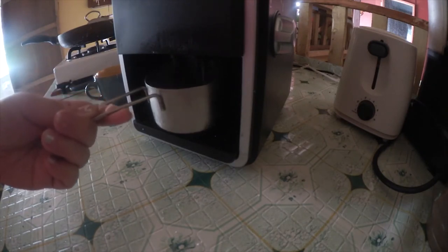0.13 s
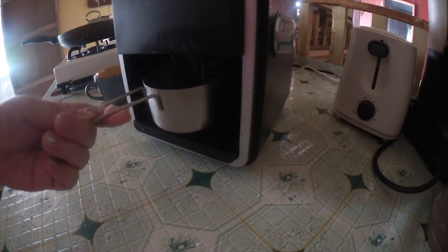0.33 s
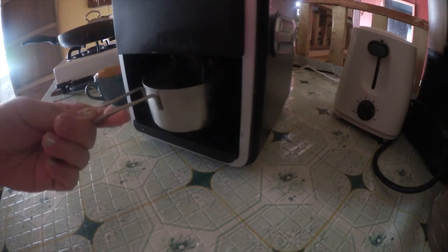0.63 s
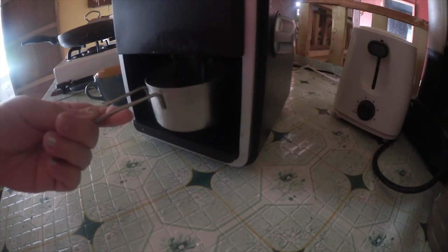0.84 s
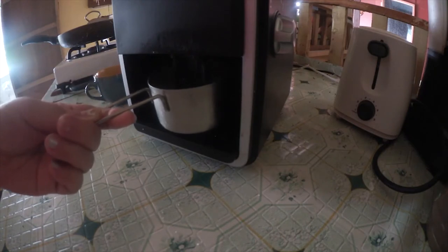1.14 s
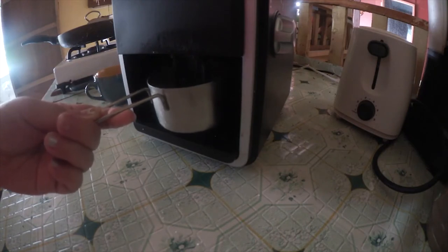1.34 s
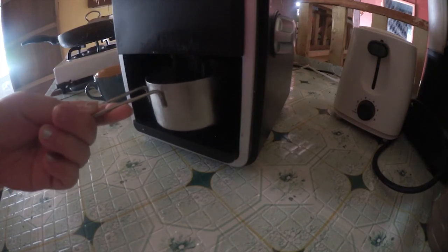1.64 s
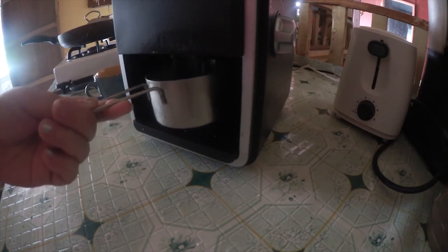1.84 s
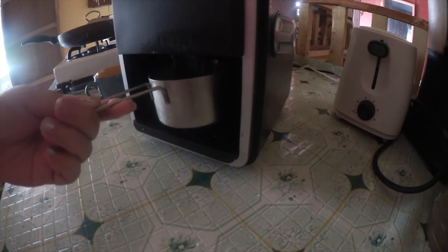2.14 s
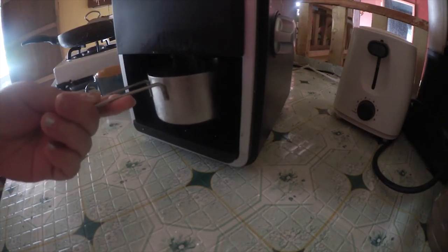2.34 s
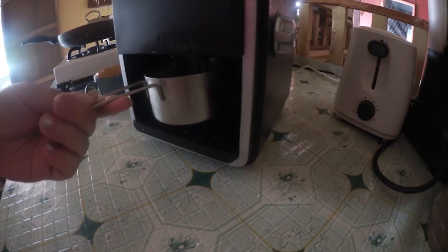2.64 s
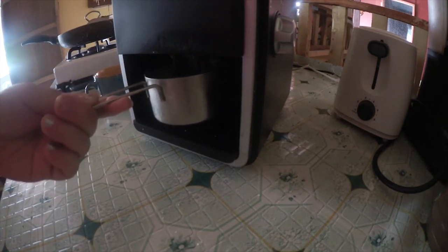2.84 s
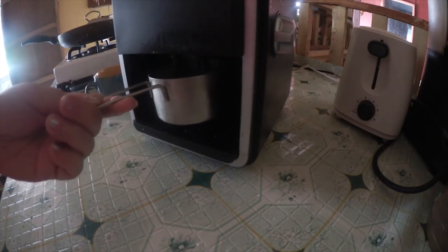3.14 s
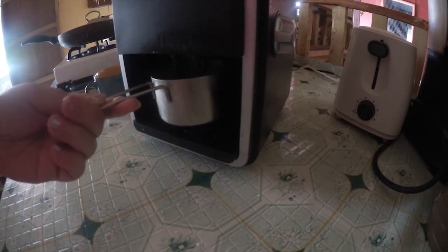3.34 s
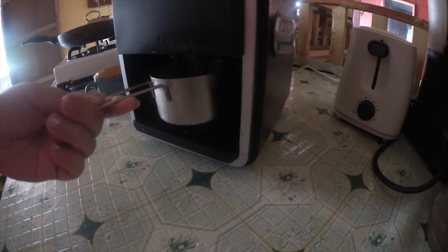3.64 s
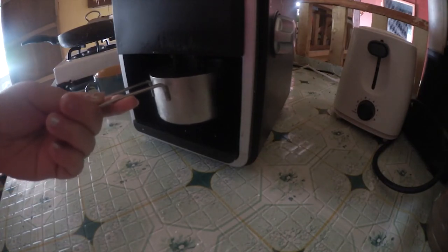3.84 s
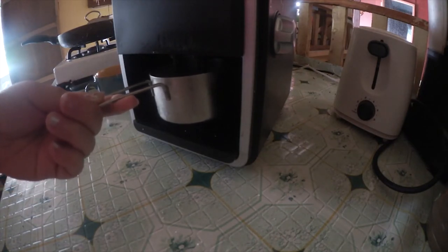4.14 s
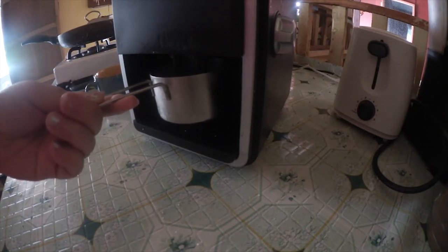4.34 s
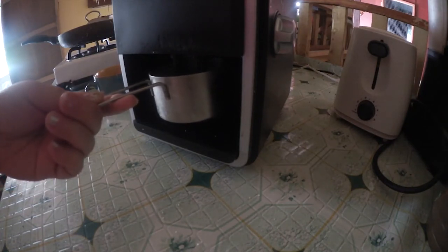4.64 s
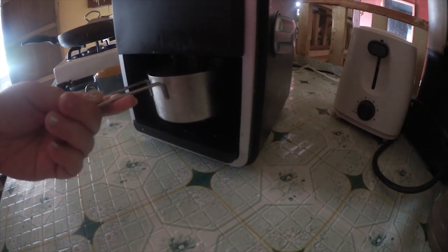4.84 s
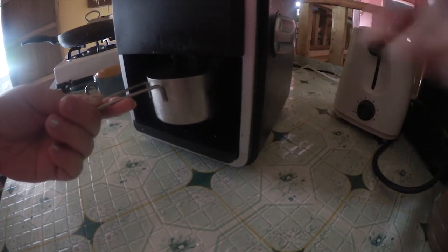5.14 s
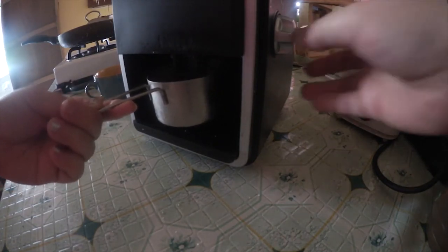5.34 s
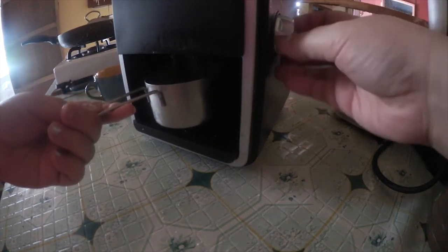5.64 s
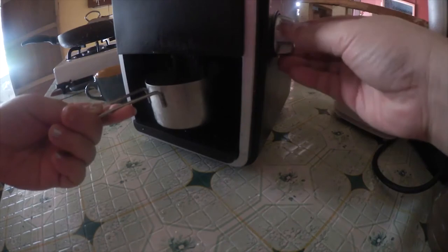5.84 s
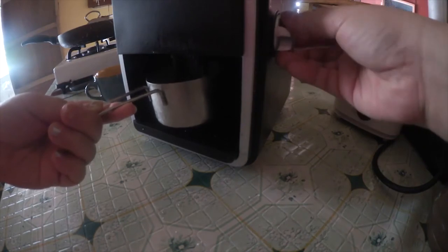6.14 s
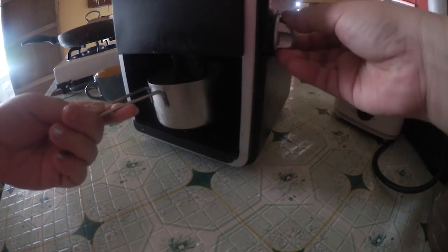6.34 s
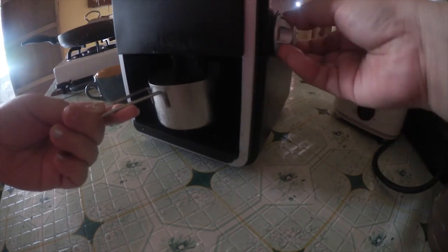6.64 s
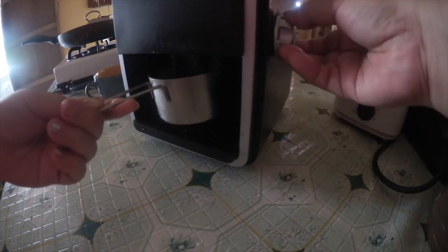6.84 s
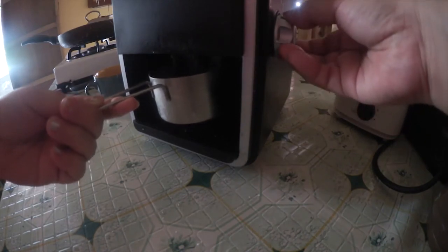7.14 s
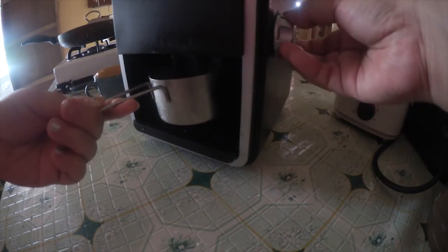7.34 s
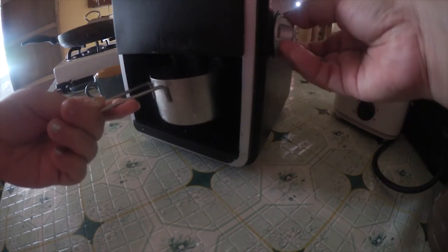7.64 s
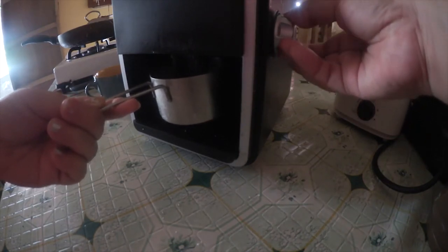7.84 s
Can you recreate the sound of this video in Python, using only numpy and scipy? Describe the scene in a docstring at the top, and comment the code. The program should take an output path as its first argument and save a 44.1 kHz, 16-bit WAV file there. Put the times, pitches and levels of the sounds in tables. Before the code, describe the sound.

From the very start, steam is already blasting into milk in a small steel cup, close and dry, with no silence. For the first 2 s a ragged screech near 1.15 kHz and its rough octave sit under bright, spitting hiss, with a thin whistle near 3 kHz; gulps and a metallic ring grow from about 1.1 s. From 2.2 to 3.5 s it is steadier, a clearer screech with strong upper tone. At 3.55 s it stumbles, dips briefly, then continues lower, near 1 kHz, fluttering and gulping until 5.4 s. Around 5.5-5.8 s the valve is eased: the hiss falls away and the tone leaps to about 1.3 kHz, then wavers downward. From 6 to 8 s a hollow, unsteady whistle dominates, with short hiss spits and breaks near 6.6-6.9 s, low milk thumps at 6.0, 6.2, 6.9 and 7.8 s, and swelling gurgles. A faint hum and low noise lie underneath; it ends still running.

```python
"""Steam frothing milk

A steam nozzle froths milk in a small steel cup, close to a small microphone.
Steam bubble: swells and collapses about a thousand times a second, two rough tones made of sine and noise.
Milk and cup: noise through resonances gurgles, rings and roars; gulps and low thumps come and go.
Jet: coloured noise hisses above, breaking for instants; the valve is later eased shut.
A high whistle of narrow noise sits over the tones; faint low noise and a hum of sines lie below."""
import sys
import numpy as np
from scipy import signal
from scipy.fft import rfft, irfft, next_fast_len
from scipy.io import wavfile
from scipy.ndimage import uniform_filter1d, minimum_filter1d

SR = 44100
rng = np.random.default_rng(int(sys.argv[2]) if len(sys.argv) > 2 else 0)


def persist_wave(psi):
    """Save psi, clipped to +-1, as 16-bit WAV."""
    counts = np.round(np.clip(psi, -1, 1) * 32767).astype(np.int16)
    wavfile.write(sys.argv[1], SR, np.atleast_2d(counts).T)


N = 353152


def gain_of(db):
    """Turns decibels into a plain multiplier."""
    return 10 ** (np.asarray(db) / 20)


def evened(x):
    """Scales a signal to an average strength (rms) of 1."""
    return x / np.sqrt(np.mean(x ** 2) + 1e-20)


def columns(rows, t):
    """Joins the rows of a table with straight lines over time, one curve per column."""
    s, *values = np.transpose(rows)
    return [np.interp(t, s, v) for v in values]


def wander(span_s):
    """Smooth chance of rms 1 that changes within span_s."""
    size = max(int(span_s * SR), 1)
    smooth = uniform_filter1d(rng.standard_normal(N), size)
    return evened(uniform_filter1d(smooth, size))


def resonate(x, hz, width):
    """A moving resonance: shifts the curve hz down to zero, smooths twice, and shifts back."""
    turn = np.exp(2j * np.pi * np.cumsum(hz * np.ones(N)) / SR)
    r = np.exp(-np.pi * width / SR)
    smoothed = signal.lfilter([1], np.convolve([1, -r], [1, -r]), x / turn)
    return (turn * smoothed).real


def sustained(hz, width, hold):
    """Narrow noise on the curve hz; a self-driven bubble holds its strength: hold (0-1) flattens swells."""
    noise = evened(resonate(rng.standard_normal(N), hz, width))
    z = signal.hilbert(noise, next_fast_len(N))[:N]
    flattened = (z / (abs(z) + 0.084) ** np.clip(hold, 0, 1)).real
    return evened(resonate(flattened, hz, 6.5 * width))


# How far the work has come: tip shallow until the 1st time, deep from the 2nd to the 3rd,
# valve closing from the 4th; columns: (time [s])
STAGE_TIMES = [2.2, 2.7, 5.4, 5.7]


def staged(t, values):
    """Glides between one value for each stage: tip shallow, deep, valve closing."""
    return np.interp(t, STAGE_TIMES, np.array(values)[[0, 1, 1, 2]])


# Bands of noise that stand out or fall back for a while; each fades in just before its first time:
# (time fully in [s], time from there until gone [s], centre [Hz], width [Hz], change [dB])
PASSING_BANDS = [(0.061, .59, 2100, 72, 7.5), (1.951, 0.35, 1910, 200, 10), (0.25, 0.5, 2900, 170, 9),
                 (0.94, 0.63, 1710, 120, 7.5), (0.792, 0.71, 6570, 1560, 4), (0.25, 0.32, 7700, 600, 8),
                 (1.301, 0.97, 9400, 640, 3.5), (1.791, 0.12, 2420, 120, 9), (1.71, 0.29, 2770, 300, 4.5),
                 (1.7, 0.45, 3370, 360, -4), (2.901, 0.68, 1300, 300, -13), (2.4, 0.66, 7000, 1300, 5.5),
                 (3.051, 0.27, 8500, 750, 4.5), (2.551, 0.5, 5500, 330, 1.5),
                 (3.101, 0.435, 2370, 220, 5.5), (4.201, 0.58, 1560, 300, -6),
                 (6.281, 0.23, 1620, 280, -11), (5.3, 0.22, 5730, 590, 1.5), (6.011, 0.18, 3700, 430, 3),
                 (6.061, 0.25, 5400, 1300, 5.5), (5.331, 0.17, 5900, 3000, 3),
                 (6.051, 0.73, 2830, 360, 2.5), (6.551, 0.68, 450, 140, 14), (6.961, 0.16, 2450, 120, 11),
                 (7.331, 0.26, 6000, 1000, 6), (7.3, .12, 4300, 1100, 5), (1.821, .06, 5500, 2200, 7)]
BAND_FADE_S = 0.034


def rush(spectrum, modes, patchy_db, tilt_db=0, tilt_hz=8000):
    """Noise of a given colour with modes and drifting patches; tilt_db lifts what lies above tilt_hz."""
    frames, hz = N // 256 + 5, np.fft.rfftfreq(1024, 1 / SR)[:, None]
    a, b, patches = rng.standard_normal((frames, 513, 3)).T
    patches = uniform_filter1d(patches, 8, 0)
    patches = evened(uniform_filter1d(patches, 14, 1))
    f, db = np.transpose(spectrum)
    colour = np.interp(np.log(hz + 1), np.log(f), db, -90, -90)
    t = np.arange(frames) * 256 / SR
    for mode, width, *lifts in modes:
        lift = staged(t, np.resize(lifts, 3))
        colour = colour + lift / (1 + (2 * (hz - mode) / width) ** 2)
    for s, length, mode, width, lift_db in PASSING_BANDS:
        fade = np.clip(np.minimum(t - s + BAND_FADE_S, s + length - t) / BAND_FADE_S, 0, 1)
        colour = colour + fade * lift_db / (1 + (2 * (hz - mode) / width) ** 2)
    tilt = np.interp(t, np.arange(np.size(tilt_db)) / SR, np.atleast_1d(tilt_db))
    tilt = tilt / (1 + (tilt_hz / (hz + 1)) ** 6)
    z = (a + 1j * b) * gain_of(colour + patchy_db * patches + tilt)
    return evened(signal.istft(z, nperseg=1024, noverlap=768)[1][:N])


# Steam bubble, before wobble and surges:
# (time [s], collapse rate [Hz], first tone level [dB], second tone level [dB])
STEAM_BUBBLE = [(0, 1161, -39.5, -34.5), (.55, 1157, -42, -33), (.77, 1186, -39, -29.5),
                (.93, 1195, -35.5, -31), (1.05, 1124, -33, -40.5), (1.4, 1106, -33.5, -37),
                (1.62, 1094, -29, -28), (1.7, 1031, -44, -63), (1.96, 1086, -30.5, -29.5),
                (2.3, 1090, -34.5, -38.5), (2.58, 1104, -36.5, -29), (3.16, 1078, -35.5, -25),
                (3.49, 1107, -31.5, -43), (3.53, 1090, -53, -50), (3.56, 790, -44, -50),
                (3.597, 990, -28.5, -39), (3.8, 1043, -32, -27), (3.88, 1010, -34.5, -38),
                (3.93, 1031, -25, -33), (4.03, 1034, -32, -27), (4.34, 1016, -33.5, -33.5),
                (4.39, 1093, -33, -33), (4.52, 1037, -35, -32.5), (4.6, 1073, -34, -38),
                (4.67, 1003, -31.5, -28), (4.77, 1061, -36, -27.5), (4.82, 1012, -30, -26),
                (4.97, 991.4, -34.5, -30.5), (5.15, 1024, -34, -25.5), (5.25, 1048, -37.5, -31),
                (5.3, 994, -32.5, -39), (5.375, 994, -32, -43), (5.4, 985, -46, -55),
                (5.5, 1070, -41.5, -46), (5.62, 1305, -46, -45), (5.75, 1307, -28.5, -35),
                (5.8, 1242, -29, -33.5), (5.97, 1175, -29, -42), (6.03, 1178, -26.5, -35.5),
                (6.16, 1306, -23, -43), (6.25, 1234, -24.5, -46), (6.4, 1220, -22.5, -36.5),
                (6.51, 1189, -19.5, -28.5), (6.6, 1149, -32.5, -34.5), (6.7, 1093, -24.5, -38),
                (6.85, 1160, -22.5, -37.5), (6.92, 1077, -24.5, -54), (6.97, 1111, -21.5, -45),
                (7.1, 1182, -21.5, -54), (7.21, 1030, -23.5, -46), (7.3, 1203, -26.5, -53),
                (7.6, 1062, -28, -43), (8, 1151, -25.5, -49)]
# Quick wobble of the collapse rate, scaled down where the bubble is less ragged:
# (tip shallow [share], deep [share], valve closing [share])
RATE_WOBBLE = (.022, .018, .045)
# Raggedness 0-1 (more means more noise in the tones) in the three stages, and in a clear whistle.
RAGGED, RAGGED_CLEAR = (.78, .85, .92), .42
# A mode of the cup draws the smeared second tone toward it, by this share, in the three stages.
PULL_HZ, PULL = (2290, 2133, 2470), (0.23, 0.51, 0.46)
# The smeared second tone also strays by this share, this quickly.
SHIFT, SHIFT_S = .017, .04


def screech(t):
    """Two tones locked to the collapse rate smear into noise when ragged; a high whistle sits above them."""
    hz, first_db, second_db = columns(STEAM_BUBBLE, t)
    clear = clearness(t)
    ragged = (1 - clear) * staged(t, RAGGED) + clear * RAGGED_CLEAR
    wobble = staged(t, RATE_WOBBLE) * wander(0.003894) + .015 * wander(0.02991)
    hz = hz * (1 + ragged * wobble)
    phase = 2 * np.pi * np.cumsum(hz) / SR
    pulled_hz = 2 * hz + staged(t, PULL) * (staged(t, PULL_HZ) - 2 * hz)
    smear_hz = {1: hz, 2: pulled_hz * (1 + SHIFT * wander(SHIFT_S))}
    tones = []
    for k, width, hold in [(1, 120.0, 1.0), (2, 215.0, 0.41)]:
        noise_share = ragged ** (1 / k ** 2)  # the higher tone smears sooner
        pure = np.sqrt(2 * (1 - noise_share ** 2)) * np.sin(k * phase)
        tones.append(pure + noise_share * sustained(smear_hz[k], width, hold))
    surge = gain_of(1.94 * ragged * wander(0.051))  # a ragged bubble comes in surges
    first = gain_of(first_db + 1.6 * ragged * wander(0.041))
    second = gain_of(second_db + 3.4 * ragged * wander(0.014))
    return surge * (first * tones[0] + second * tones[1] + high_whistle(t))


# High whistle near 3 kHz, later at 3600 Hz as the bubble's third tone, before its drift:
# (time [s], pitch [Hz], level [dB])
HIGH_WHISTLE = [(0, 3030, -46), (.3, 2970, -37), (.6, 3040, -41.5), (.8, 2990, -48), (1.5, 3040, -42.5),
                (2.0, 3030, -67), (2.95, 3045, -41.5), (3.45, 3060, -41), (3.55, 3026, -49),
                (3.7, 3050, -39.5), (4.0, 3060, -49.5), (4.3, 3051, -38), (4.4, 3077, -49),
                (4.52, 3031, -42), (4.65, 3049, -50), (5.0, 3055, -41), (5.2, 3078, -36), (5.3, 3080, -51),
                (5.53, 3050, -49), (5.7, 2985, -51), (6.4, 3600, -62), (6.47, 3600, -52), (6.66, 3600, -45),
                (6.7, 3570, -54), (6.9, 3570, -61), (8, 3615, -67)]
# Drift of its pitch: (tip shallow [share], deep [share], valve closing [share])
HIGH_WHISTLE_DRIFT = (.013, .013, .003)


def high_whistle(t):
    """High whistle near 3 kHz, later at 3600 Hz (the bubble's third tone): narrow noise, drifting pitch."""
    hz, level_db = columns(HIGH_WHISTLE, t)
    hz = hz * (1 + staged(t, HIGH_WHISTLE_DRIFT) * wander(0.025))
    return gain_of(level_db + 2.7 * wander(0.039)) * sustained(hz, 160.0, hold=.3)


# Steam jet and the roar it makes in the cup, before flutter and hush; the treble tilt counts against
# its own average over the first 5 s: (time [s], hiss level [dB], treble tilt [dB], cup roar level [dB])
STEAM_JET = [(0, -34, -10.5, -32.5), (.6, -34.5, -13, -32.5), (1.3, -34.5, -12.5, -36.5),
             (1.8, -36, -12, -31), (2.4, -34, -13, -31), (3.4, -35, -9.5, -33.5), (3.65, -32.5, -14.5, -32),
             (4.3, -33.5, -14, -34.5), (4.8, -34.5, -15, -34), (5.2, -32, -16.5, -36.5),
             (5.53, -34.5, -18.5, -37.5), (5.66, -38.5, -24, -42), (5.69, -41.5, -26, -41),
             (5.8, -46.5, -24, -37.5), (5.97, -47, -22, -41), (6.06, -41, -17, -36),
             (6.3, -39.5, -20.5, -37), (6.46, -37, -24.5, -34), (6.55, -48.5, -19.5, -34.5),
             (6.74, -43.5, -22, -34), (6.9, -45.5, -21, -37.5), (7.3, -47.5, -16.5, -36),
             (8, -41, -18.5, -39)]
# Colour of the hiss before modes and tilt: (frequency [Hz], level per Hz [dB])
HISS_COLOUR = [(1940, 8.5), (3300, 1), (3640, -6), (4590, 2), (6150, -1), (7330, -1.5), (8350, -7.5),
               (9320, -8), (10400, -12.5), (13600, -16), (15600, -27.5)]
# Modes in the hiss:
# (frequency [Hz], width [Hz], lift with tip shallow [dB], lift deep [dB], lift with valve closing [dB])
HISS_MODES = [(3510, 145, 14.5, 2, 3.5), (3550, 120, -7, -10, 9.5), (3940, 130, -3.5, -1.5, 8),
              (3870, 200, 0.5, 8.5, 6.5), (4450, 550, 5.5, 1, 4.5), (4605, 190, -9.5, -3.5, 11),
              (4676, 240, -5, 5.5, -15), (5510, 290, -1.5, 5, 5.5), (5605, 250, 6.5, 1.5, -7),
              (6053, 120, 11, 3, 1.5), (9200, 630, 3, 0.5, 2.5)]
TOP_FOLLOWS = 1.8  # the treble tilt changes by this many dB for each dB of break or spit


def jet(t):
    """Hiss that flutters and spits as the tip dips in and out of the foam."""
    hiss_db, top_db, _ = columns(STEAM_JET, t)
    drop_db, spit_db = breaks(t)
    burst_db = 1.9 * wander(0.016)  # bursts in the middle of the hiss; the top octave stays steadier
    quick_db = (1.4 + 0.33 * np.maximum(spit_db, 0)) * wander(0.0015)
    flutter_db = burst_db + 0.67 * wander(0.0049) + quick_db
    tilt_db = top_db - top_db[:SR * 5].mean()
    tilt_db = tilt_db + TOP_FOLLOWS * (spit_db + drop_db) - 1.07 * burst_db
    hiss = rush(HISS_COLOUR, HISS_MODES, patchy_db=2.5, tilt_db=tilt_db)
    return gain_of(hiss_db + spit_db + flutter_db) * hiss


# Churned milk between gulps, before wander and sputter:
# (time [s], gurgle centre [Hz], gurgle level [dB], ring level [dB])
MILK_CHURN = [(0, 900, -48, -49), (.55, 928, -45, -42), (1.2, 933, -37.5, -34), (2.0, 940, -34, -32),
              (2.8, 917.5, -41, -35), (2.9, 910, -38.5, -42.5), (3.3, 890, -45.5, -48.5),
              (3.6, 930, -34, -35), (4.3, 932, -37.5, -39), (5.2, 930.3, -42.5, -40),
              (5.5, 887, -38, -34.5), (5.68, 767, -36, -31.5), (5.9, 718.6, -33.5, -36),
              (6.1, 797, -32.5, -36), (6.45, 860.7, -31.5, -31.5), (6.55, 885.4, -35, -38),
              (6.92, 931, -31.5, -31.5), (7.0, 730, -29.5, -31.5), (7.3, 826, -27, -28.5),
              (7.65, 863.5, -29.5, -30), (8, 770, -23, -34.5)]
RING_HZ, RING_DRIFT = 1390, (0.007, 0.01, 0.03)  # the drift is a share, for the three stages


def churn(t):
    """Large air pockets gurgle low and the air over the milk rings, both sputtering; the cup roars."""
    hz, gurgle_db, ring_db = columns(MILK_CHURN, t)
    hz, clear = hz * (1 + 0.033 * wander(0.051)), clearness(t)
    rough = evened(resonate(rng.standard_normal(N), hz, 241.0))
    steady = sustained(hz, 111.0, hold=0.091)
    gurgle = np.sqrt(1 - clear) * rough + np.sqrt(clear) * steady
    ring_hz = RING_HZ * (1 + staged(t, RING_DRIFT) * wander(0.053))
    ring = sustained(ring_hz, 153.0, hold=0.19)
    sputter = gain_of(0.87 * wander(0.015))
    gulp, gulp_ring = gulps(t)
    milk = gain_of(gurgle_db) * gurgle + gulp + (gain_of(ring_db) + gulp_ring) * ring
    return sputter * milk + cup_roar(t)


# Colour of the roar before modes and tilt: (frequency [Hz], level per Hz [dB])
ROAR_COLOUR = [(900, -55), (1500, 3), (1700, 6), (2300, -2), (2700, -4.5), (3050, -9.5), (3320, -22),
               (3600, -45), (5000, -71)]
# Modes in the roar:
# (frequency [Hz], width [Hz], lift with tip shallow [dB], lift deep [dB], lift with valve closing [dB])
ROAR_MODES = [(1843, 390, 5.5, 7, 6.5), (1973, 87, -26, -4, 3), (2017, 78, 10, -11, -9),
              (2490, 210, 7, 12.5, 5), (3040, 190, 8.5, -1, 3)]
CLEAR_HUSH_DB = 4  # the low part of the roar falls back while the whistle is clear


def cup_roar(t):
    """Churned milk roars through the modes of cup and air column: coloured noise."""
    hush_db = CLEAR_HUSH_DB * clearness(t)
    roar_db = columns(STEAM_JET, t)[2] - hush_db + 2.4 * wander(0.032)
    # the tilt gives back to the upper part what the hush takes away
    return gain_of(roar_db) * rush(ROAR_COLOUR, ROAR_MODES, patchy_db=3.0, tilt_db=hush_db, tilt_hz=1870)


# Faint machine hum, before it wavers: (frequency [Hz], level [dB])
MACHINE_HUM = [(390, -77.5), (783, -56.5)]


def machine_hum():
    """Faint hum of sines that waver in pitch and level."""
    hum = np.zeros(N)
    for hz, db in MACHINE_HUM:
        level = np.sqrt(2) * gain_of(db + 2.6 * wander(0.086))
        phase = 2 * np.pi * hz * np.cumsum(1 + 0.00503 * wander(0.202)) / SR
        hum += level * np.sin(phase)
    return hum


# Faint low noise under the steam, stronger as the sound grows loud:
# (tip shallow [dB], deep [dB], valve closing [dB])
LOW_NOISE_LEVELS = (-65, -61.5, -59.5)
# Colour of the low noise: (frequency [Hz], level per Hz [dB])
LOW_NOISE_COLOUR = [(35, -36), (60, -29), (189, -14.5), (393, -15), (463, -10), (600, -5), (780, -24),
                    (1320, -120)]


def low_noise(t):
    """Faint low noise under the steam, stronger as the sound grows loud: coloured noise, level by stage."""
    return gain_of(staged(t, LOW_NOISE_LEVELS)) * rush(LOW_NOISE_COLOUR, [], patchy_db=5.0)


# Gulps of air folded into the milk, before scoop and sag:
# (start [s], length [s], pitch [Hz], tone level [dB], ring level [dB])
AIR_GULPS = [(0.602, 0.082, 925, -51, -31), (1.122, 0.065, 910, -58, -28.5), (1.193, 0.12, 1140, -38, -25),
             (1.425, 0.037, 1004, -23.5, -52), (1.58, 0.11, 950, -23, -45), (1.676, 0.12, 860, -32, -29),
             (1.801, 0.26, 922, -27.5, -47), (2.51, 0.11, 962, -24, -30.5), (3.51, 0.097, 715, -43, -43),
             (3.579, 0.16, 850, -28.5, -53), (3.86, 0.15, 869, -27, -51), (4.121, 0.03, 943, -24, -47),
             (4.593, .025, 1110, -38, -20), (4.615, 0.083, 904, -26, -33), (4.77, 0.17, 960, -35, -34.5),
             (4.935, 0.087, 970, -22.5, -43), (5.064, 0.035, 936.5, -22.5, -44),
             (5.12, 0.091, 943, -27, -58), (5.3, 0.15, 875, -27, -33), (6.002, 0.15, 775, -30, -44),
             (6.122, 0.26, 795.6, -43, -28.5), (6.94, 0.1, 677.8, -29.5, -28),
             (7.686, 0.077, 900.4, -26, -40), (7.79, 0.17, 743, -25, -52)]
GULP_RISE_S, GULP_END_S, GULP_SAG_DB = 0.013, 0.021, 8
GULP_SCOOP, GULP_SCOOP_S = 0.09, 0.019  # each gulp starts this share low and rises to its pitch


def gulps(t):
    """Each gulp starts quickly, sags and ends: its own low tone, and the gain it gives the ring."""
    gains, pitch = np.zeros((2, N)), np.full(N, float(AIR_GULPS[0][2]))
    for s, length, hz, *levels_db in AIR_GULPS:
        age = t - s
        fade = np.clip(np.minimum(age / GULP_RISE_S, (length - age) / GULP_END_S), 0, 1)
        shape = fade * gain_of(-GULP_SAG_DB * np.clip(age / length, 0, 1))
        gains += np.outer(gain_of(levels_db), shape)
        begun = age > 0
        pitch[begun] = hz * (1 - GULP_SCOOP * np.exp(-age[begun] / GULP_SCOOP_S))
    tone = sustained(pitch * (1 + 0.017 * wander(0.017)), 124.0, hold=0.2)
    return gains[0] * tone, gains[1]


# The steam breaks for an instant; where the tip meets air the hiss spits up. A negative drop is a rise:
# (middle time [s], length [s], drop of all the steam [dB], further change of the hiss [dB])
STEAM_BREAKS = [(0.679, 0.11, 2, -0.5), (0.879, 0.026, 3, 0), (0.967, 0.013, 5.5, -0.5),
                (1.188, 0.011, 8.5, 8), (3.558, 0.07, 0.5, -6.5), (3.757, 0.02, 3.5, 1.5),
                (4.379, 0.075, 1.5, -1), (4.587, 0.013, 2.5, -2), (4.783, 0.033, -0.5, -3.5),
                (5.26, 0.058, 0.5, -4), (5.294, 0.018, -4, -13.5), (5.498, 0.022, 2, -2),
                (6.616, 0.1, 3, 8.5), (6.783, 0.034, 6.5, 5.5), (6.931, 0.02, 8, 7.5),
                (7.618, 0.016, -0.5, -4), (7.739, 0.012, 0.5, -7)]
BREAK_EDGE_S = .0025


def breaks(t):
    """Change of all the steam and further change of the hiss, in dB, with a soft edge at each break."""
    changes_db = np.zeros((2, N))
    for s, length, drop_db, hiss_db in STEAM_BREAKS:
        inside = (1 - np.tanh((abs(t - s) - length / 2) / BREAK_EDGE_S)) / 2
        changes_db += np.outer([-drop_db, hiss_db], inside)
    return changes_db


def choke(t):
    """Gain of all the steam, changed at each break."""
    return gain_of(breaks(t)[0])


# Spells when the bubble settles into a clearer whistle: (start [s], end [s], clearness [0-1])
CLEAR_SPELLS = [(1.001, 1.198, 0.8), (1.948, 2.302, 0.49), (2.8, 3.524, 0.92), (3.578, 3.804, 0.59),
                (3.898, 4.362, 0.81), (4.399, 4.604, 0.59), (4.666, 5.2, 0.44), (5.26, 5.448, 0.98),
                (5.723, 6.56, 0.23), (6.655, 6.927, 0.3), (7.027, 7.227, 0.44)]
SETTLE_S = 0.052


def clearness(t):
    """How clearly the bubble whistles: 0 is ragged, 1 is clear."""
    total = np.zeros_like(t)
    for start, end, share in CLEAR_SPELLS:
        total += share * np.clip(np.minimum(t - start, end - t) / SETTLE_S, 0, 1)
    return np.clip(total, 0, 1)


# Low thumps of milk folding over: (start [s], level before rise and decay [dB], centre [Hz])
MILK_THUMPS = [(3.579, -35, 550), (3.919, -26, 556), (5.997, -21.5, 500), (6.215, -20.5, 300),
               (6.3, -24, 280), (6.945, -16.5, 451.9), (7.782, -20, 527)]


def thumps(t):
    """Short puffs of low resonant noise that die in a few tens of milliseconds."""
    envelope, pitch = np.zeros(N), np.full(N, float(MILK_THUMPS[0][2]))
    for s, db, hz in MILK_THUMPS:
        age = np.maximum(t - s, 0)
        envelope += gain_of(db - 1030 * age) * (1 - np.exp(-age / 0.0034))  # falls 1030 dB per second
        pitch[age > 0] = hz
    return envelope * sustained(pitch, 180.0, hold=0.69)


# Colour of the microphone and counter top: (frequency [Hz], gain [dB])
MICROPHONE_COLOUR = [(350, -22.5), (440, -19), (510, -5), (570, -18), (640, -3), (3150, 0.5), (3300, -4),
                     (3500, 1.5)]
# Resonances of the steel that colour all of the steam: (frequency [Hz], width [Hz], lift [dB])
STEEL_MODES = [(800, 90, 2), (1000, 90, 4), (1190, 90, 4), (1290, 80, -2), (1600, 150, -3), (2090, 70, 4),
               (2190, 70, 3), (2340, 80, 4), (2700, 200, -3), (3040, 160, 4)]


def scene():
    """Colours steam, milk and thumps with steel and microphone, then adds the hum and low noise."""
    t, hz = np.arange(N) / SR, np.fft.rfftfreq(2 * N, 1 / SR)
    f, db = np.transpose(MICROPHONE_COLOUR)
    colour = np.interp(np.log(hz + 1), np.log(f), db)
    for mode, width, lift_db in STEEL_MODES:
        colour = colour + lift_db / (1 + (2 * (hz - mode) / width) ** 2)
    steam = choke(t) * (screech(t) + jet(t) + churn(t)) + thumps(t)
    coloured = irfft(rfft(steam, 2 * N) * gain_of(colour))[:N]
    return (coloured + machine_hum() + low_noise(t))[None]


EDGE_HZ = 15680  # little is left above this


def record(dry):
    """A fast limiter follows the peaks within a millisecond or two; then the band limit."""
    top, knee = .2, 4.  # ceiling as a share of full scale; a higher knee bends more sharply
    peaks = -minimum_filter1d(-abs(dry), size=35)
    peaks = uniform_filter1d(uniform_filter1d(peaks, size=17), size=17)
    limited = dry / (1 + (peaks / top) ** knee) ** (1 / knee)
    low_pass = signal.firwin(2047, EDGE_HZ, window=("kaiser", 9), fs=SR)
    return signal.oaconvolve(limited, low_pass[None], "same")


dry = scene()
out = record(dry)
persist_wave(out)
```